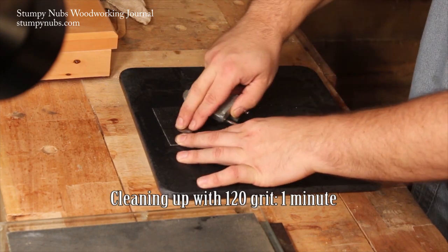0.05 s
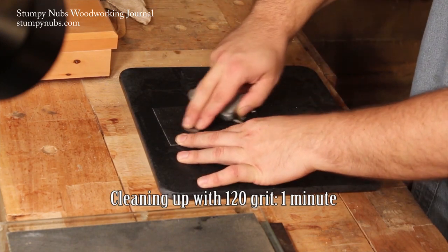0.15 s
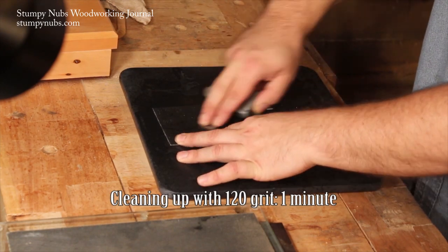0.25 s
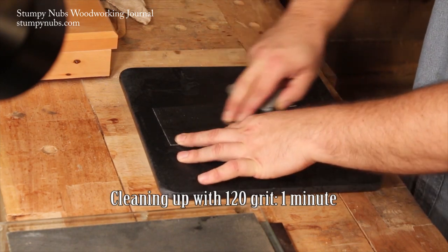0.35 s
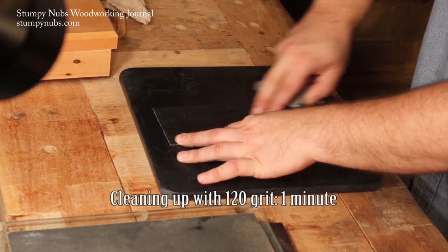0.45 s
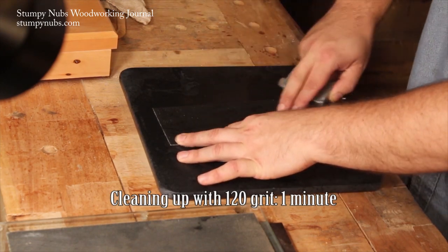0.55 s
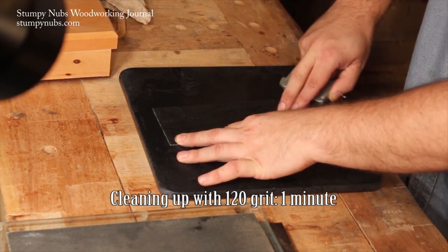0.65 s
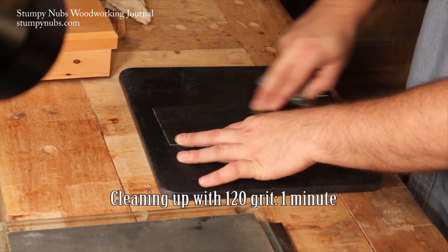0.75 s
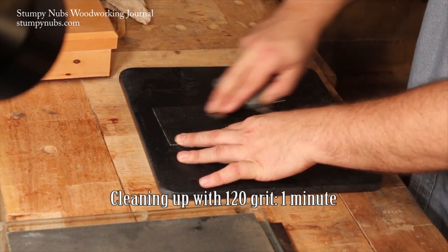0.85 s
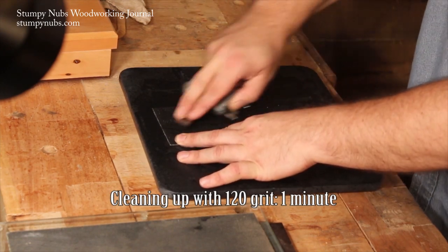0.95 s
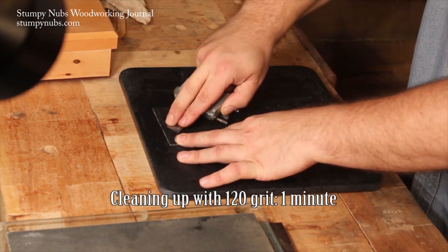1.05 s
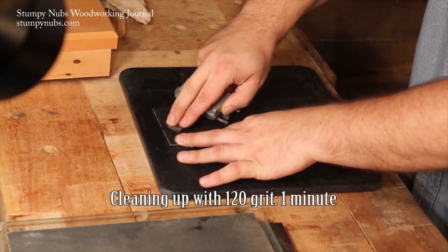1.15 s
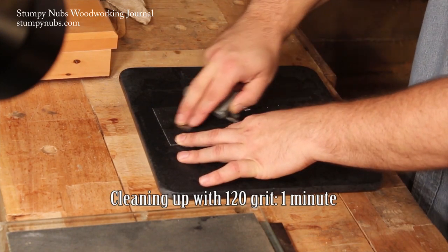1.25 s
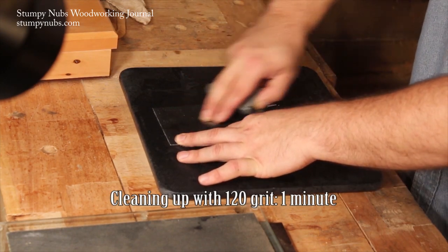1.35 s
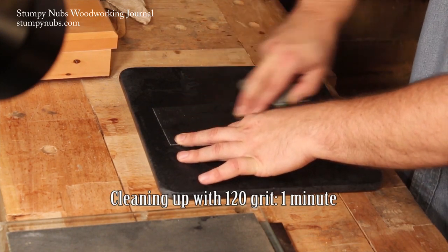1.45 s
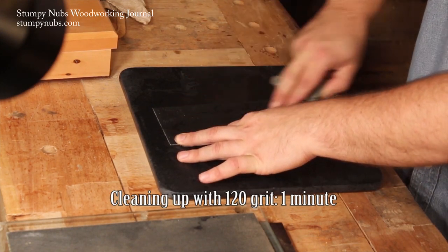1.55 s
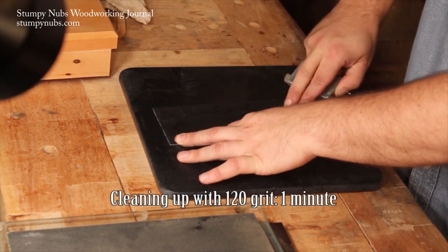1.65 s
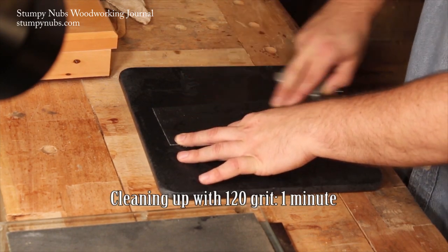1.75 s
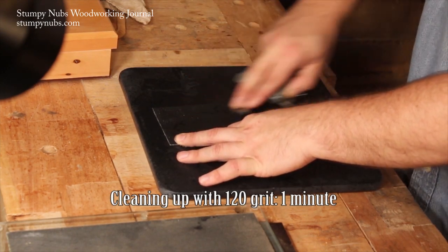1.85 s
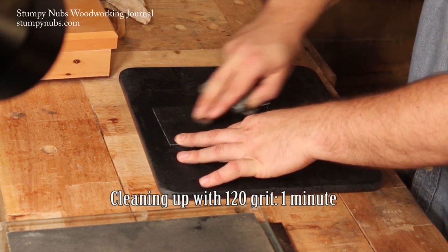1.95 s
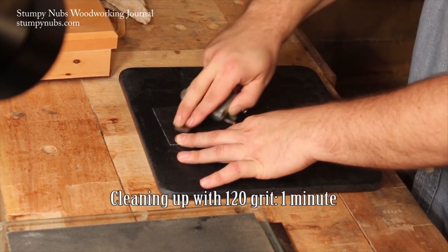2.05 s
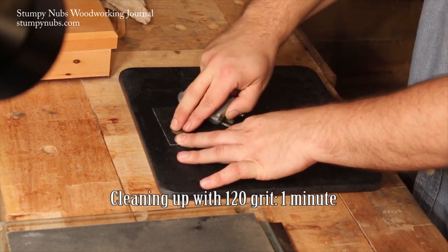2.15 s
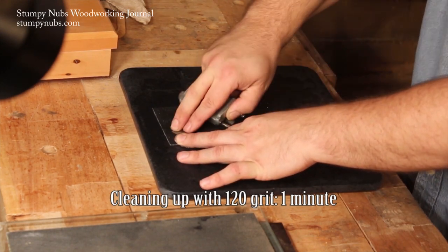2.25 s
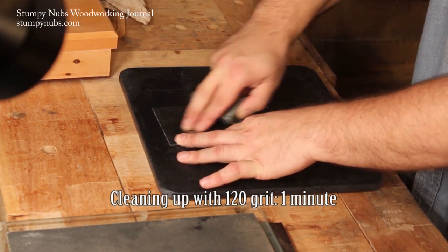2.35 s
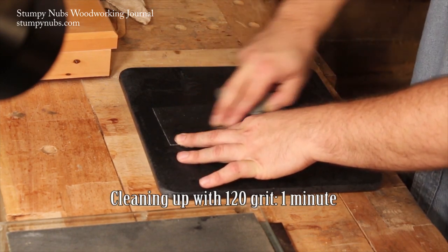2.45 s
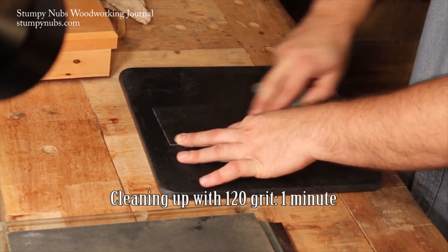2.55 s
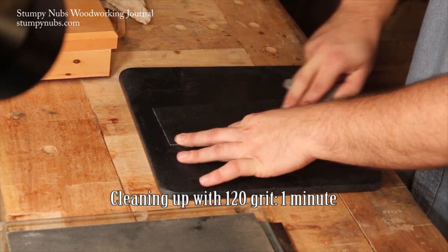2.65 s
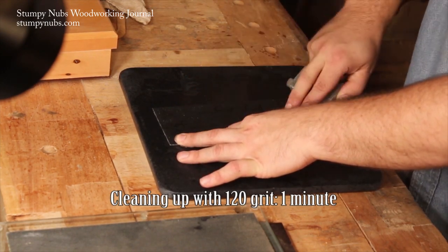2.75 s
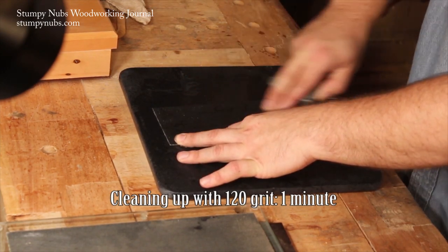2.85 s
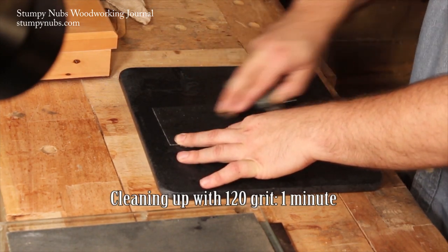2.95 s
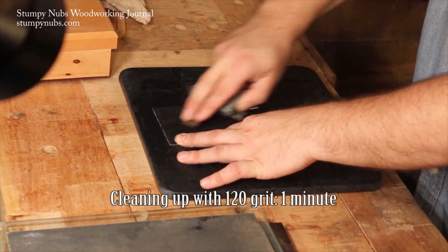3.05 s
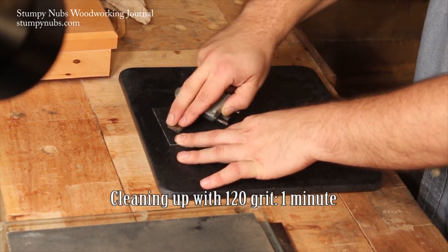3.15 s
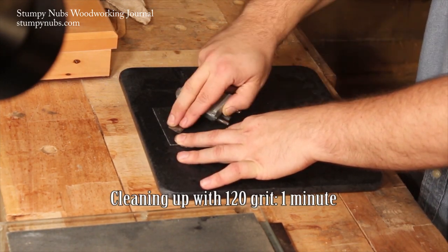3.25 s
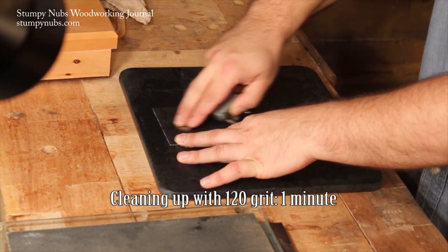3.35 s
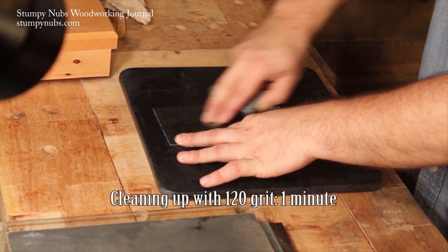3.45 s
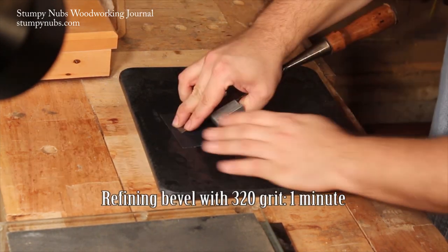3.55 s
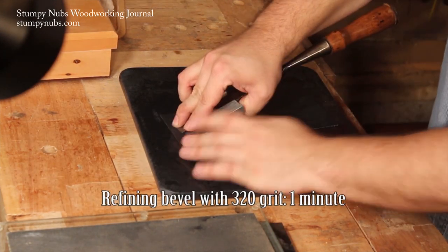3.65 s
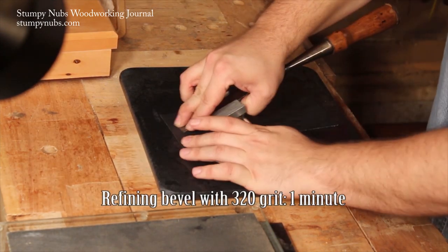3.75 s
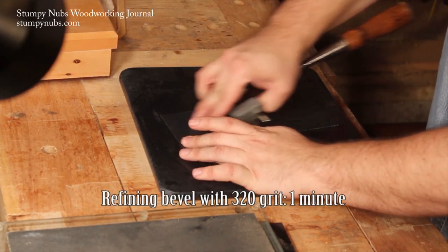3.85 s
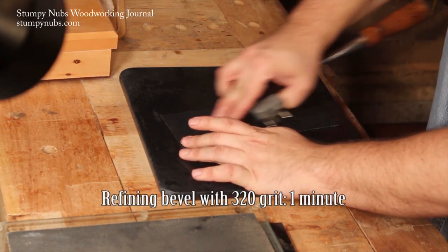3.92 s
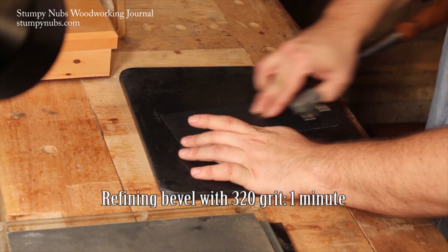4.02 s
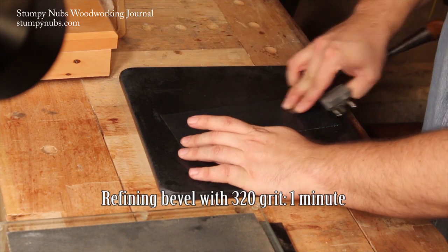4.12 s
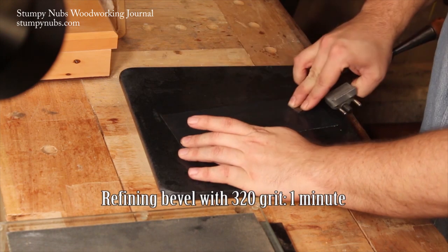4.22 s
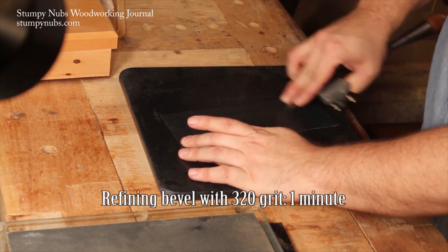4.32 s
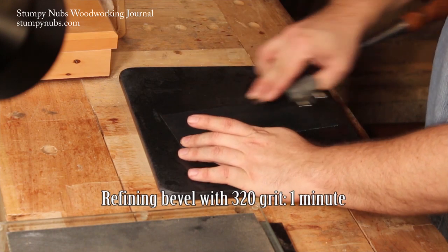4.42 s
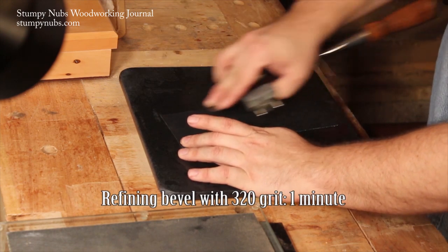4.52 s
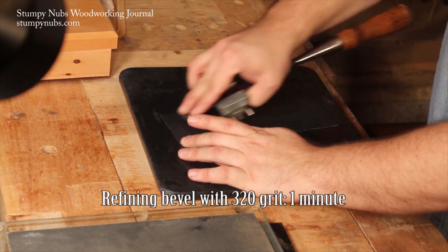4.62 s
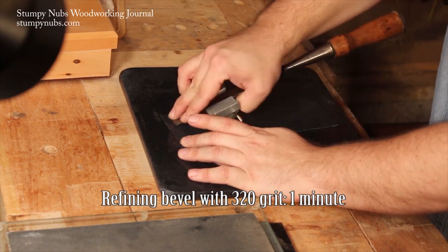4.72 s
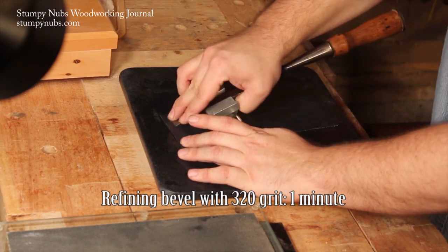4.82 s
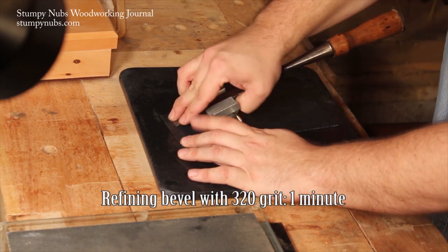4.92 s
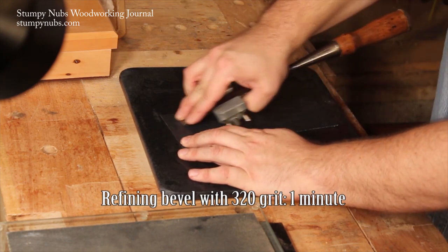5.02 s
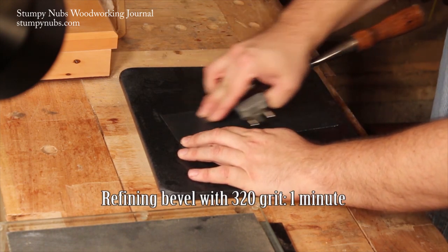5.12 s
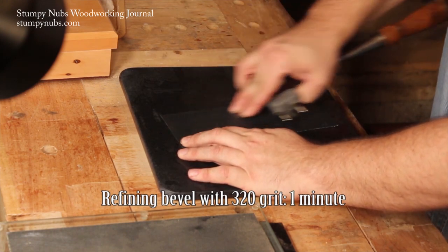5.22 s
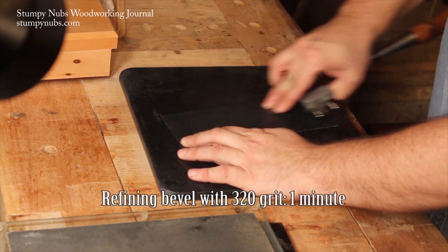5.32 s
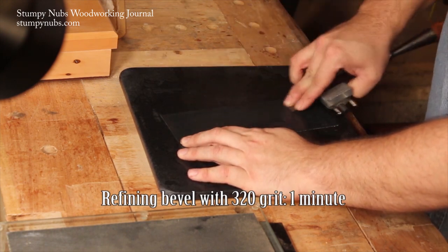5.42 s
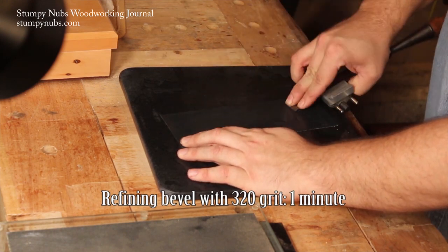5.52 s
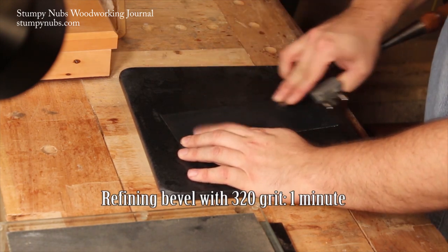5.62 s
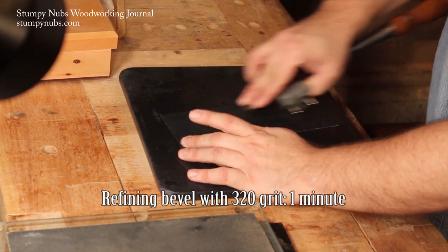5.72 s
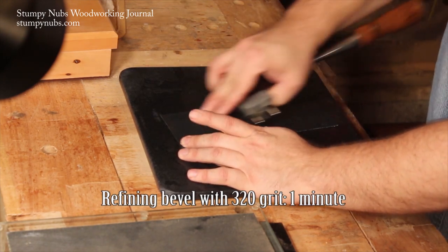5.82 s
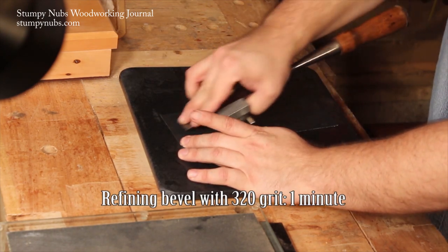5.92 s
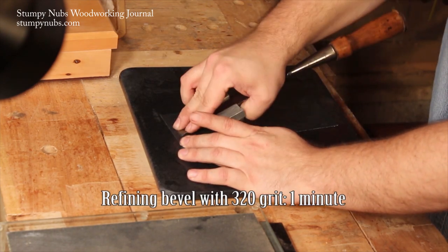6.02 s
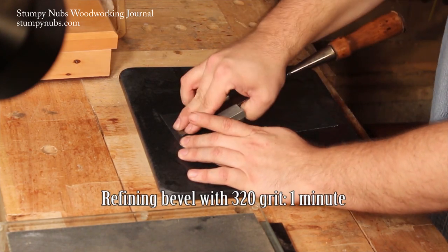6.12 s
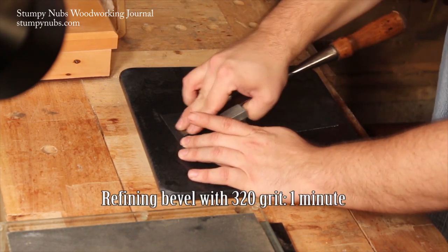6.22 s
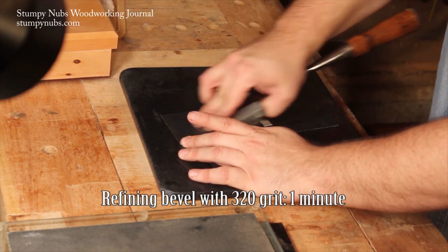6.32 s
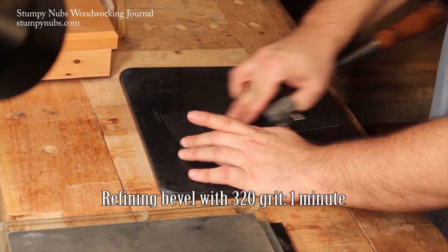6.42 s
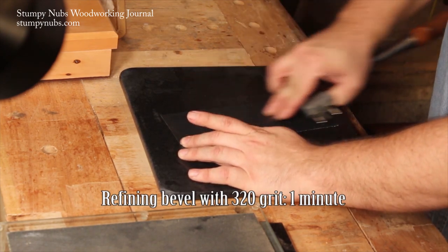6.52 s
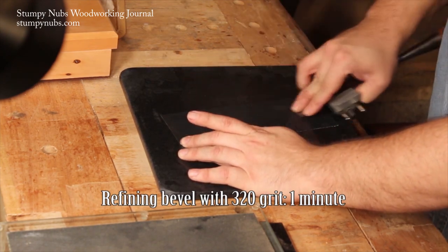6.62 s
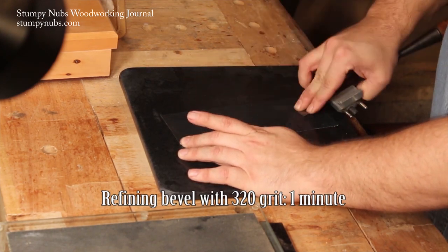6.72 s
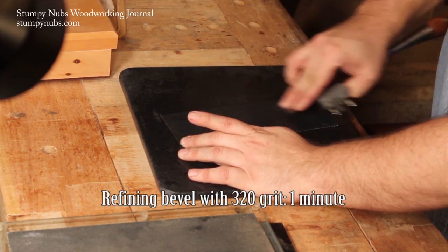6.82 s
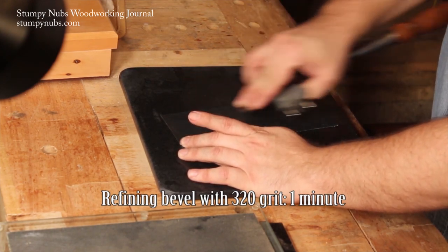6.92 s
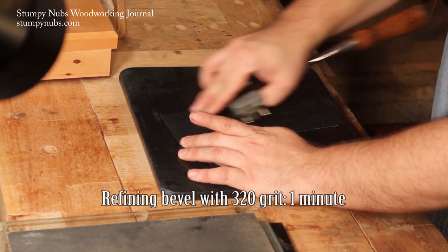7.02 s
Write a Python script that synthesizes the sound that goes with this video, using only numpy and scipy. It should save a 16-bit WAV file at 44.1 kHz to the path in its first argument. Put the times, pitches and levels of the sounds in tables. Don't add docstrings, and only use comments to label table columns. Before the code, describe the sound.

A steel chisel in a roller guide rasps over coarse then fine sandpaper on glass, with knocks and rattles between strokes and low hum beneath.

```python
import sys
import numpy as np
from scipy import signal
from scipy.fft import rfft, irfft, next_fast_len
from scipy.io import wavfile
from scipy.ndimage import uniform_filter1d, map_coordinates

SR = 44100
rng = np.random.default_rng(int(sys.argv[2]) if len(sys.argv) > 2 else 0)


def rack_gain(trim_db):
    fader = np.asarray(trim_db, float)
    return 10 ** (fader / 20)


def master_out(mix):
    frames = np.transpose(np.atleast_2d(mix))
    ceiling = np.clip(frames, -1, 1)
    pcm = np.round(ceiling * 32767).astype(np.int16)
    wavfile.write(sys.argv[1], SR, pcm)


N = 311787
CUT_S = 3.565


def unit(x):
    return x / np.sqrt(np.mean(x ** 2) + 1e-20)


def along(points, hz):
    f, v = np.transpose(points)
    return np.interp(np.log(hz + 1), np.log(f + 1), v)


def curves(rows):
    s, first, *rest = np.transpose(rows)
    t = np.arange(N) / SR
    return np.array([np.interp(t, s, first, -200, -200)] + [np.interp(t, s, c) for c in rest])


def wobble(rate_hz):
    knots = rng.standard_normal(int(N * rate_hz / SR) + 4)
    return map_coordinates(knots, [np.arange(N) * rate_hz / SR])


def filtered(x, response):
    m = next_fast_len(x.shape[-1] + SR // 4)
    return irfft(rfft(x, m) * response(np.fft.rfftfreq(m, 1 / SR)), m)[..., :x.shape[-1]]


def body(modes):
    def response(f):
        return sum((-1) ** k * rack_gain(db) * 1j * f * w / (c * c - f * f + 1j * f * w)
                   for k, (c, w, db) in enumerate(modes))
    return response


def coloured(spectrum, x):
    return unit(filtered(x, lambda hz: rack_gain(along(spectrum, hz))))


def shifting(x, depth_db):
    z = signal.stft(x, nperseg=512)[2]
    field = uniform_filter1d(rng.standard_normal(z.shape), size=4, axis=0)
    field = uniform_filter1d(field, size=20, axis=1)
    return signal.istft(z * rack_gain(depth_db * unit(field)), nperseg=512)[1][:N]


# f/Hz, width/Hz, level/dB
PLATE_COARSE = [(274, 21, -6.5), (349, 30, -14.5), (564, 97, -1.5), (656, 50, 3), (749, 60, -0.5),
                (1051, 54, 4), (1161, 95, 1), (1310, 51, 2)]
PLATE_FINE = [(359, 88, -13.5), (536, 143, -8.5), (651, 73, -1), (743, 33.4, 5), (854, 270, -9),
              (1111, 76, 2.5), (1362, 88, -8.5)]
GUIDE = [(1744, 190, -4.5), (1915, 158, -1.5), (2156, 240, 0), (2336, 172, -2.5)]
BLADE_COARSE = [(2570, 133, -9), (2840, 94, -7), (3150, 85, -4), (3365, 155, -3.5), (3700, 220, -11),
                (4473, 133, -4), (4640, 470, -9), (5525, 240, -10.5)]
BLADE_FINE = [(2604, 180, -6), (2860, 79, -3.5), (3196, 144, -2.5), (3565, 134, -1.5), (3710, 94, -16.5),
              (4540, 227, -4), (4780, 280, -6.5), (5610, 360, -11)]
# f/Hz, width/Hz, level/dB
TIP_COARSE = [(5950, 250, -21), (7010, 54, 34.5), (7830, 250, 13.5), (8880, 310, 29)]
TIP_FINE = [(6750, 300, -35), (7360, 160, 19.5), (8070, 105, 18.5), (9680, 97, 13.5)]
# f/Hz, width/Hz, level/dB
SONG = [(3905, 134, 0)]
# f/Hz, level/dB per Hz
FIZZ_COARSE = [(4800, -56), (5600, 1), (6400, -4.5), (8400, -3), (11000, -8.5), (13900, -11.5),
               (15800, -16.5)]
FIZZ_FINE = [(5000, -23), (5800, 3.5), (8200, -5.5), (8700, -6.5), (11000, -6.5), (15700, -15)]
UNEVEN_DB = 0.55


def rasp(touches, plate, blade, tip, fizz, spiky_db, chatter_db, tip_db, guide_db):
    height_db = spiky_db * rng.exponential(size=N) + chatter_db * wobble(90)
    grit = unit(rng.standard_normal(N) * rack_gain(height_db))
    moving = shifting(grit, depth_db=1.5)
    shank = filtered(moving, body(blade[:5]))
    bevel = filtered(moving, body(blade[5:]))
    shank, bevel = unit(np.array([shank, -bevel])) / np.sqrt(2)
    guide, song, edge = (unit(filtered(moving, body(modes))) for modes in (GUIDE, SONG, tip))
    glass = unit(filtered(grit, body(plate)))
    dust = coloured(fizz, moving)
    hand = rack_gain(UNEVEN_DB * wobble(14))
    out = np.zeros(N)
    for at, blade_db, plate_db, fizz_db, song_db in touches:
        bite_db = np.clip(-.45 * (song_db + 8), -4, 4)
        steel = rack_gain(-2.5) * shank[at] + rack_gain(bite_db - 2.0) * bevel[at] + rack_gain(song_db + 1.06) * song[at]
        rollers = rack_gain(0.37 * np.minimum(plate_db, 8) + guide_db) * guide[at]
        holder = rack_gain(plate_db) * glass[at] + rollers
        top = rack_gain(fizz_db - 1.0) * (dust[at] + rack_gain(tip_db + bite_db) * edge[at])
        out[at] += rack_gain(blade_db) * (steel + holder + top)
    return out * hand


# t gathering speed/s, t lift/s, early rasp/dB, late rasp/dB, speeding-up time/s
PULLS_COARSE = [
    (0.17, 0.635, -29.5, -24.5, 0.028),
    (1.272, 1.705, -24.5, -26.5, 0.048),
    (2.345, 2.755, -24, -27, 0.074),
    (3.375, 3.7, -24.5, -25.5, 0.079),
]
PULLS_FINE = [
    (3.81, 4.2, -27, -29, .04),
    (4.985, 5.13, -39, -36.5, 0.036),
    (5.105, 5.445, -24, -27, 0.024),
    (6.285, 6.62, -28, -35.5, 0.038),
]
START_DB, KNEE_S = 34.5, 0.016
FIZZ_THINS, FIZZ_LIFTS = 0.09, 0.4
SONG_FADES_AT = .55
SONG_GROWS = 0.62


def pulls(rows, fall_db_per_s, plate_db, plate_grows, plate_holds, plate_fades_db,
          fizz_db, fizz_gains_db, song_db, loss_db):
    for start, lift, early_db, late_db, rise_s in rows:
        at = slice(round((start - .1) * SR), min(round((lift + .25) * SR), N))
        t = np.arange(N)[at] / SR
        along_pull = np.clip((t - start) / (lift - start), 0, 1)
        held_db = early_db + (late_db - early_db) * along_pull
        slow_db = START_DB * np.exp((start - t) / rise_s)
        lifted_db = fall_db_per_s * KNEE_S * np.logaddexp(0, (t - lift) / KNEE_S)
        light_db = np.minimum(slow_db + lifted_db, 30)
        damped = 1 / (1 + np.exp((SONG_FADES_AT - along_pull) / .05))
        blade_now_db = held_db - slow_db - lifted_db
        plate_now_db = plate_db + plate_grows * light_db
        plate_now_db = plate_now_db - plate_holds * (early_db + 26.5) - plate_fades_db * along_pull
        fizz_now_db = fizz_db + fizz_gains_db * along_pull
        fizz_now_db = fizz_now_db - FIZZ_THINS * slow_db - FIZZ_LIFTS * lifted_db
        song_now_db = song_db + SONG_GROWS * (early_db + 27) - loss_db * damped
        yield at, blade_now_db, plate_now_db, fizz_now_db, song_now_db


# t/s, rasp/dB, fade/dB per s, plate re blade/dB, fizz re blade/dB
LANDINGS = [(0.003, -51, 298, -1, -8), (1.121, -42.5, 393.5, -1.5, -10), (1.187, -52, 390, 3, -11),
            (1.255, -48.5, 200, 1, -5), (2.206, -47.5, 300, 2, -6), (2.368, -55, 104, 3, -7),
            (3.241, -54, 400, 6, 1), (3.332, -53.5, 200, 6, -2), (3.602, -51, 250, -4, -6),
            (3.747, -54, 330, -21, -11), (4.818, -55, 300, 16, -24), (5.518, -35, 197, 3.5, -13.5),
            (6.11, -46, 300, -3, -5.5), (6.145, -56, 400, 8, -7), (6.205, -48.5, 300, 3, -10)]
SCUFFS = [(0.13, -50.5, 100, -3, -12), (0.748, -42.5, 410, -1.5, -8), (1.728, -44, 353, 8, -30),
          (1.807, -45, 440, -2, -11), (2.27, -65, 300, 4, -14), (2.324, -70, 400, 5, -18),
          (2.79, -50, 400, 8, -20), (2.89, -48, 800, -1, -8), (3.295, -50, 800, -8, -15),
          (3.364, -54, 405, -1, -13), (4.168, -41, 400, -24, -4), (4.204, -44, 500, -27, -21),
          (4.236, -32, 270, 4.5, -18), (4.33, -45.5, 203, -2.5, -10), (4.871, -48, 372, 16, -4),
          (5.485, -29, 885, -10, -11.5), (6.615, -33, 300, -14, -6), (6.66, -34, 200, -21, -8),
          (6.722, -39.5, 298, -4, -22), (6.762, -53.5, 145, 9.5, -25)]
LANDING_RISE_DB_PER_S, SCUFF_RISE_DB_PER_S, SCUFF_SONG_DB = 8000, 512, -6


def scuffs(rows, rise_db_per_s):
    for s, db, fade, plate_db, fizz_db in rows:
        at = slice(max(round((s - .06) * SR), 0), min(round((s + .3) * SR), N))
        t = np.arange(N)[at] / SR - s
        blade_db = db + np.minimum(rise_db_per_s * t, -abs(fade) * t)
        yield at, blade_db, plate_db, fizz_db, SCUFF_SONG_DB


# t/s, plate peak/dB, thump re plate/dB, guide re plate/dB, blade re plate/dB
KNOCKS = [(0.002, -40.5, 6.5, -13, -17), (0.132, -54, -3, -12, 3), (1.122, -34.5, 7.5, -18, -13),
          (1.187, -45, -6, -6, 5), (1.255, -46, -14, -5, 5), (2.207, -27.5, 3.5, -10, -4.5),
          (2.358, -37, -15, 1.5, -11), (3.24, -36.5, 4.5, -5, 4.5), (3.332, -39.5, -14, -7, -7),
          (3.602, -40.5, 5, -11, -1), (3.619, -44.5, 13.5, -14, 4), (3.746, -56, 15, -8, 8),
          (5.572, -34.5, 0, -5, 3), (5.601, -44.5, 8, 8, 11), (5.718, -55, -9, 8, -9),
          (6.11, -28.5, -1, -0.5, -10), (6.159, -31, -22, -21, -8)]
SLAMS = [
    (4.817, -1.5, -23.5, -17, -31),
    (4.863, -29, -10, -10, -29),
    (6.143, -21, -9, -27, -33),
    (6.203, -26.5, -10, -25, -28),
]
# t/s, plate peak/dB, guide re plate/dB, blade re plate/dB, contact/ms
DROPS = [(4.202, -22.5, 6.5, 7.5, 4.5), (4.21, -16, 9, -13, 1.8), (4.236, -20.5, -3, -9, 3),
         (4.245, -18.5, -17, -9, 3.1), (4.267, -28, 2, -5, 6.4), (4.299, -30.5, -3, -3, 5.5),
         (5.441, -34, 10.5, 14.5, 4.4), (5.475, -39, 14, 12, 2.5), (5.485, -29, 8, 9, 3.1),
         (5.518, -21.5, -3, -8, 2.7), (5.527, -28, 8, -6, 4), (6.7028, -19, 8.5, 1, 4.8),
         (6.735, -19.5, -3.5, -13, 4.3), (6.741, -18, -15, -3.5, 1.55), (6.771, -34, -14, -12, 4)]
# f/Hz, width/Hz, level/dB
STRUCK_PLATE = [(490, 40, -1.5), (633, 79, 5.5), (687, 114, 5), (1037, 160, -3), (1340, 59, -18)]
SLAMMED_PLATE = [(487, 93, -5), (747, 44, 4), (1030, 103, 5.5), (1210, 210, 4)]
STRUCK_GUIDE = [(1686, 83, 14.5), (2000, 120, -15), (2490, 170, 3.5)]
STRUCK_BLADE = [(3175, 45, 6), (3630, 160, 8.5), (4110, 340, 2), (4320, 780, -9), (5260, 440, -14),
                (7460, 1900, -13.5)]
BENCH = [(141, 86, -8), (211, 78, -6), (262, 33, -3), (373, 15, -2)]
DROP_THUMP_DB, KNOCK_MS, SLAM_MS = -14, 0.74, 0.21


def contacts(events, plate, guide, blade, slips, lead_s):
    out, t = np.zeros(N + SR), np.arange(SR // 5) / SR
    s, db, thump_db, guide_db, blade_db, ms = np.transpose(events)[..., None]
    u = t / (np.maximum(ms, .05) / 1000)
    force = u * np.exp(1 - u) * (1 + slips * rng.standard_normal(u.shape))
    for modes, rel_db in ((plate, 0), (BENCH, thump_db), (guide, guide_db), (blade, blade_db)):
        def soft(f):
            return body(modes)(f) / (1 + 1j * f / (1.4 * modes[-1][0])) ** 4
        rings = filtered(force, soft)
        rings = rack_gain(db + rel_db) * rings / np.abs(rings).max(axis=1, keepdims=True)
        for at, ring in zip(s[:, 0], rings):
            out[max(round((at - lead_s) * SR), 0):][:len(t)] += ring
    return out[:N]


# f/Hz, t60/s
SHOP = [(200, 0.36), (1000, 0.12), (4000, 0.15), (12000, 0.067)]


def shop(x):
    hz, t, z = signal.stft(rng.standard_normal(SR // 3), SR, nperseg=256)
    tail = signal.istft(z * rack_gain(-60 * t / along(SHOP, hz)[:, None]), SR, nperseg=256)[1]
    delayed = np.pad(x, (260, 0))
    return x + rack_gain(-10) * signal.fftconvolve(delayed, tail / np.linalg.norm(tail))[:N]


# f/Hz, level/dB rms
HUM = [(60, -43), (120, -52.5), (150, -61), (300, -67.5), (420, -78.5), (780, -78)]
# t/s, level/dB
BEAT = [(0.0, -48), (0.29, -71), (0.69, -56), (0.92, -50.5), (1.0, -72), (1.16, -52.5), (1.32, -62),
        (1.89, -51), (3.23, -58.5), (3.4, -46), (3.78, -64.5), (4.2, -49.5), (4.51, -73), (4.82, -50),
        (5.7, -56.5), (5.95, -48.5), (6.61, -62.5), (6.8, -40)]
# f/Hz, width/Hz, level/dB rms
WHINE = (1572, 30, -73)
# t/s, drone/dB, rumble/dB
ENGINE = [
    (3.57, -46.5, -47),
    (4, -46.5, -42),
    (4.3, -42, -47.5),
    (4.8, -42, -50.5),
    (5.15, -50, -45.5),
    (5.5, -64, -55),
]
# f/Hz, level/dB per Hz
ENGINE_RUMBLE = [(70, -38), (95, 14), (140, 17), (170, 1), (230, -28.5)]
# t/s, level/dB
THUDS = [
    (2.36, -29),
    (2.94, -50),
]
# f/Hz, level/dB per Hz
AIR = [(15, -38), (45, -3), (100, -7), (190, -5), (400, -17), (800, -16), (2100, -28), (15700, -57)]


def background():
    t = np.arange(N) / SR
    jump = 2.87 * (t > CUT_S)
    hum = np.zeros(N)
    for hz, db in HUM:
        level_db = db + min(0.096 + hz / 70, 3) * wobble(2.9)
        hum += np.sqrt(2) * rack_gain(level_db) * np.sin(2 * np.pi * hz * t + jump)
    motor = np.sqrt(2) * rack_gain(curves(BEAT)[0]) * np.sin(2 * np.pi * 197.5 * t + 0.57 * wobble(7.6))
    fan = rack_gain(WHINE[2]) * unit(filtered(rng.standard_normal(N), lambda f: body([WHINE])(f) ** 2))
    drone_db, rumble_db = curves(ENGINE)
    drone = np.sqrt(2) * rack_gain(1.5 * wobble(5.16)) * np.sin(2 * np.pi * 77.3 * t + 0.53 * wobble(3.25))
    rumble = coloured(ENGINE_RUMBLE, rng.standard_normal(N))
    rumble = rack_gain(rumble_db - drone_db + 1.6 * wobble(3.57)) * rumble
    engine = rack_gain(drone_db) * (drone + rumble)
    thuds = sum(rack_gain(db - 60 * abs(t - s) / 0.14) * np.sin(2 * np.pi * 45 * (t - s)) * (t > s)
                for s, db in THUDS)
    air = rack_gain(-51 + 0.69 * wobble(4.7)) * coloured(AIR, rng.standard_normal(N))
    return hum + motor + fan + engine + thuds + air


def scene():
    knocks = [(*row, KNOCK_MS) for row in KNOCKS]
    slams = [(*row, SLAM_MS) for row in SLAMS]
    drops = [(s, db, DROP_THUMP_DB, *rest) for s, db, *rest in DROPS]
    hits = contacts(knocks, STRUCK_PLATE, GUIDE, BLADE_COARSE, slips=0.5, lead_s=0.00085)
    hits += contacts(slams, SLAMMED_PLATE, GUIDE, STRUCK_BLADE, slips=0.17, lead_s=0.00036)
    hits += contacts(drops, STRUCK_PLATE, STRUCK_GUIDE, STRUCK_BLADE, slips=12, lead_s=.003)
    brief = [*scuffs(LANDINGS, LANDING_RISE_DB_PER_S), *scuffs(SCUFFS, SCUFF_RISE_DB_PER_S)]
    coarse = [*pulls(PULLS_COARSE, fall_db_per_s=377, plate_db=-4.0, plate_grows=0.078, plate_holds=0.21,
                     plate_fades_db=1.5, fizz_db=-7.0, fizz_gains_db=-0.5, song_db=-4.5, loss_db=6.5), *brief]
    fine = [*pulls(PULLS_FINE, fall_db_per_s=600, plate_db=-9.5, plate_grows=0.63, plate_holds=.8,
                   plate_fades_db=3.5, fizz_db=-9, fizz_gains_db=1.5, song_db=-6, loss_db=3), *brief]
    first = hits + rasp(coarse, PLATE_COARSE, BLADE_COARSE, TIP_COARSE, FIZZ_COARSE,
                        spiky_db=1.5, chatter_db=0.87, tip_db=-4.5, guide_db=-6.5)
    second = hits + rasp(fine, PLATE_FINE, BLADE_FINE, TIP_FINE, FIZZ_FINE,
                         spiky_db=2.0, chatter_db=1.6, tip_db=-2.0, guide_db=-3.0)
    later = np.arange(N) / SR > CUT_S
    mono = shop(first * ~later) * ~later + shop(second * later) + background()
    return np.array([mono, mono])


def top_cut(x):
    return signal.sosfilt(signal.butter(12, 15810, fs=SR, output="sos"), x)


def record(dry):
    hiss_spectrum = [(60, -12), (300, -5), (2000, -0.5), (15000, -2)]  # f/Hz, level/dB per Hz
    hiss = rack_gain(-58.5) * coloured(hiss_spectrum, rng.standard_normal((2, N)))
    rounded = dry / (1 + abs(dry / .72) ** 4) ** (1 / 4)
    mix = filtered(rounded + hiss, lambda hz: hz < 15800)
    return top_cut(mix)


dry = scene()
out = record(dry)
master_out(out)
```